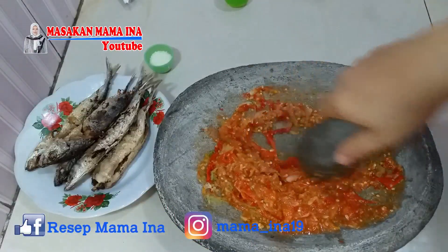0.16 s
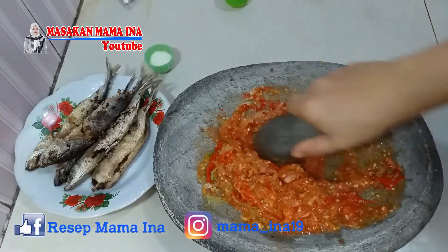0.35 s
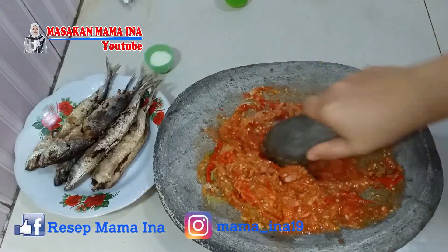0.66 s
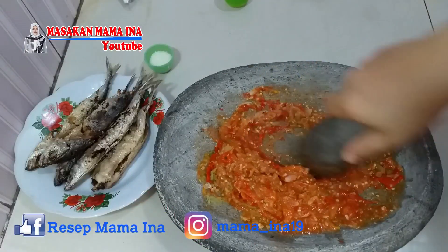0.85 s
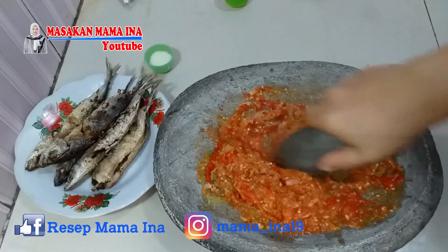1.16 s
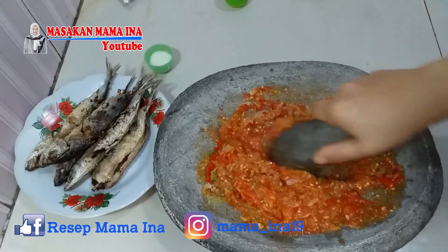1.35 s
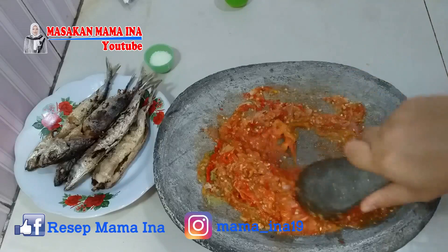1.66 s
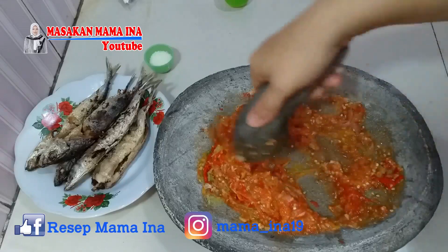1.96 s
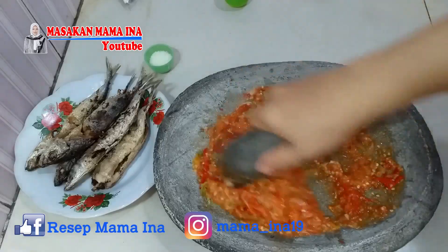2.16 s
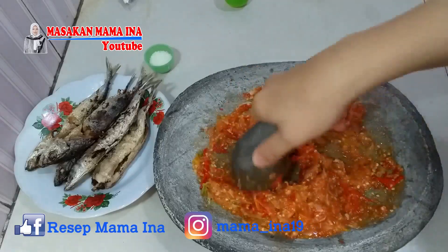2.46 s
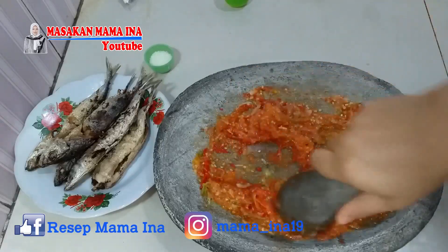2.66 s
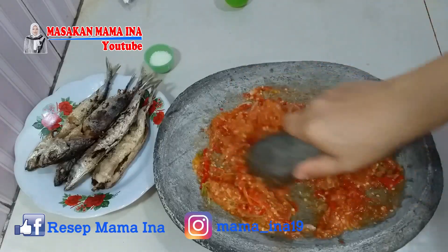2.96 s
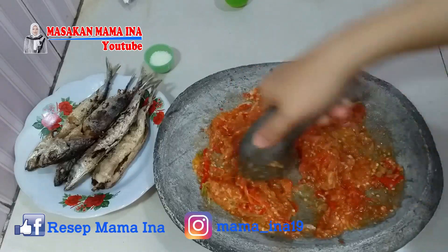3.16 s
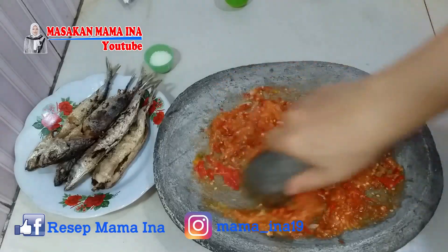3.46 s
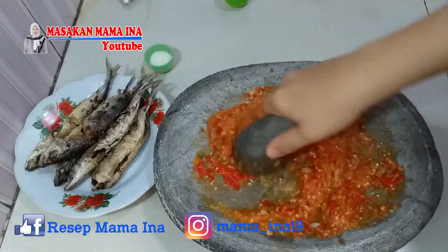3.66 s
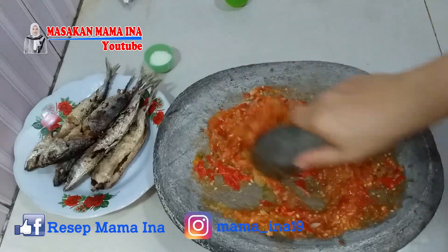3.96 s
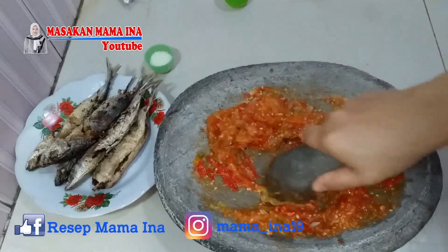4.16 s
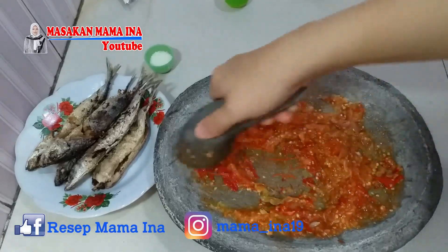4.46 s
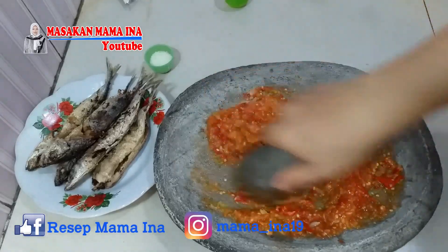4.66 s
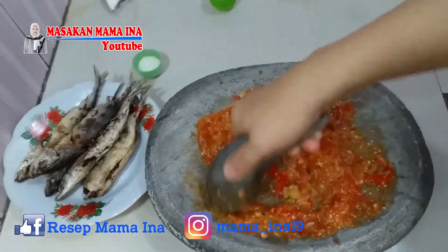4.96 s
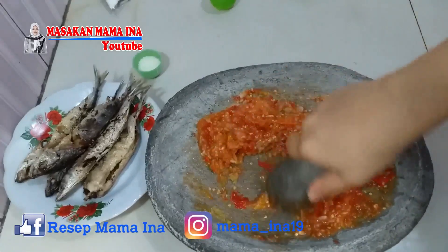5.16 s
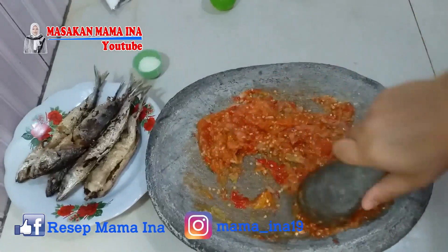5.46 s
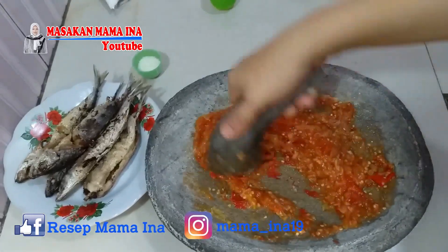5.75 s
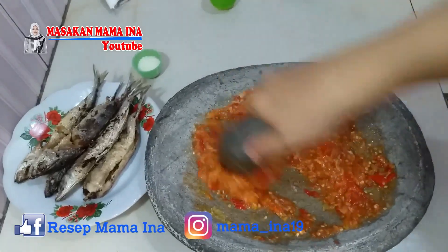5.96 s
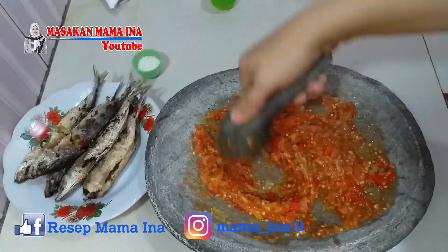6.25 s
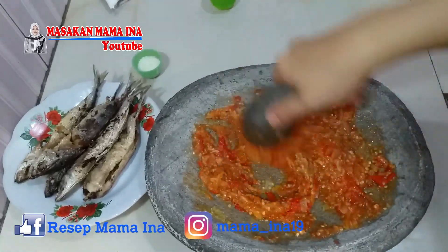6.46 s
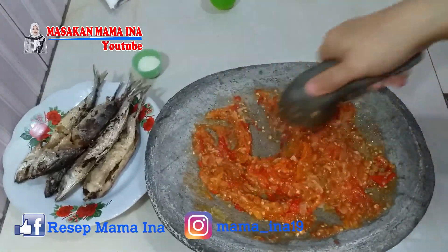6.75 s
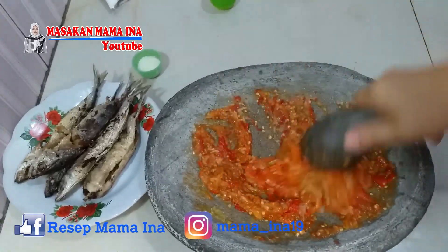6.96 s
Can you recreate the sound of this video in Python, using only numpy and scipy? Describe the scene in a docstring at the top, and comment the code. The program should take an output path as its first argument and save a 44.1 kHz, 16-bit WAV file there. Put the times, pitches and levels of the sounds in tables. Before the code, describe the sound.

A stone pestle knocks and scrapes in a stone mortar, squelching wet paste with small pops, in a hard, ringing kitchen.

```python
"""A faint scrape and wet squelching over a low hum come first, then the knocks of a stone pestle in a stone mortar.
The shallow mortar holds wet chilli paste and stands on a tiled kitchen floor.
Blows and streams of grit shake the same stone, floor and wall resonances; shaped noise makes the squelch.
Short torn tones make the pops; the hard room rings on, and the loudest blows flatten at full scale."""
import sys
import numpy as np
from scipy import signal
from scipy.fft import rfft, irfft, next_fast_len
from scipy.io import wavfile
from scipy.ndimage import uniform_filter1d, map_coordinates

SR = 44100
rng = np.random.default_rng(int(sys.argv[2]) if len(sys.argv) > 2 else 0)


def wav_out(sig):
    """Save sig, one row per channel (or a flat mono array), as 16-bit PCM at SR to the path in sys.argv[1]."""
    wavfile.write(sys.argv[1], SR, np.round(np.clip(np.atleast_2d(sig).T, -1, 1) * 32767).astype(np.int16))


N = 313992  # length of the scene in samples

# What the contacts shake: each body is a set of resonances.
# Each row: pitch in Hz, width in Hz, level in dB relative to the other rows of that body.
FLOOR_MODES = [(140.8, 8.1, 0.5), (205.3, 18.4, -1), (283, 19, -5), (334, 13, 1)]
MORTAR_BASE_MODES = [(405, 18.1, 4), (478, 13.3, 5), (561, 43, -6.5), (719.7, 85, 0), (519, 405, -8)]
WALL_MODES = [(844, 58, 5.5), (910.5, 80, 7.5), (1027, 74, 3), (1252, 160, 4), (1336, 580, -2.5)]
BOWL_MODES = [(1609, 28.3, 11.5), (1675, 24, 4), (3390, 19, -6)]
PESTLE_MODES = [(1745, 27, 10.5), (1876, 760, -8)]
PESTLE_OVERTONE_MODES = [(3307, 43, 7.5), (5240, 40, 6.5), (7020, 57, 1.5)]
GRIT_MODES = [(3093, 60, 14.5), (3740, 41, 1.5), (3930, 37, -15.5), (4760, 500, 9), (5340, 47, 10.5),
              (7770, 120, 1), (10950, 300, 3.5), (2880, 9000, -6)]


def stones():
    """Single pushes and streams of grit drive floor, mortar, wall and pestle, and each body rings in its own way."""
    pushes, crunch = blows()
    grains = gritty(grain_s=0.0012, depth_db=5)
    patches = clumps(span_bins=4, span_frames=5, depth_db=4.5)
    # the five lower bodies feel single grains; pestle overtones and grit get clumped noise
    rub = (crunch + scrapes()) * ([grains] * 5 + [patches] * 2)
    bodies = (FLOOR_MODES, MORTAR_BASE_MODES, WALL_MODES, BOWL_MODES,
              PESTLE_MODES, PESTLE_OVERTONE_MODES, GRIT_MODES)
    sound = []
    for push, drag, modes in zip(pushes, rub, bodies):
        tap = body(modes)
        # a blow is scaled by the peak of the tap, a rub by its energy
        drive = push / np.abs(tap).max() + drag / np.linalg.norm(tap)
        sound.append(signal.fftconvolve(drive, tap)[:N])
    return np.array(sound)


CRUNCH_RISE_S, CRUNCH_T60_S = 0.0032, 0.1  # time constant of the rise; time to die away by 60 dB
BLOW_OVERTONES_DB = -32.5  # overtones against the ring of the pestle
# Knocks of the pestle. Each row: start in seconds, thud level in dB, hardness in dB, mortar base over thud in dB,
# bowl ring in dB, pestle ring in dB, grit in dB, crunch in dB against the push.
PESTLE_BLOWS = [(0.642, -19, 3, -1.5, -47, -31, -23.5, -23), (0.976, -28.5, 6.5, 5.5, -36, -36, -18.5, -12),
                (1.672, -4.5, 6, 2.5, -9, -11.5, -44.5, -11),
                (2.688, -15, 0.5, 5.5, -31, -15, -25.5, -16.5),
                (2.748, -18.5, 3.5, 7.5, -42, -35, -36, -12), (3.349, -5.5, 6.5, -3.5, -2, -6.5, -10, -4),
                (3.87, -29, -3.5, 2.5, -26, -17.5, -23, -12.5),
                (4.280, -29.5, -2.5, 0.5, -58, -56.5, -24, -11), (4.522, -10, 6, 1.5, -9.5, -10.5, -16, -1),
                (4.832, -25, 1, -3, -41, -41, -19, -30.5), (5.061, -29.5, -2, -11, -30, -45.5, -30, -18),
                (5.492, -15.5, 0.5, 1, -21, -31.5, -22.5, -9.5), (6.381, -4, 3, -6.5, 5, -1.5, -15.5, -12),
                (6.549, -18, 2.5, 0, -18.5, -30, -19, -14), (6.801, -9.5, 1, -1, 6, -2, -29, -11.5)]


def blows():
    """Each blow is one push, rounded by the paste, followed by a short crunch of crushed paste that dies away."""
    pushes, crunches = np.zeros((7, N)), np.zeros((7, N + SR))
    t = np.arange(SR // 5) / SR
    swell = amp(-60 * t / CRUNCH_T60_S) * (1 - np.exp(-t / CRUNCH_RISE_S))
    for start_s, thud, hard, base, bowl, pestle, grit, crunch in PESTLE_BLOWS:
        gains = shares(thud, hard, base, bowl, pestle, BLOW_OVERTONES_DB, grit)
        first = round(start_s * SR)
        pushes[:, first] = gains
        crunches[:, first:first + len(swell)] += np.outer(gains * amp(crunch), swell)
    # paste cushions the blow: the five lower bodies get a rounded push
    contact = t[:200] ** 3 * np.exp(-t[:200] / 0.00006)
    pushes[:5] = signal.fftconvolve(pushes[:5], contact[None] / contact.sum(), axes=1)[:, :N]
    return pushes, crunches[:, :N]


SCRAPE_TOP = 0.62  # share of a scrape before its top
BASE_LEAD_DB, SCRAPE_OVERTONES_DB = 3.5, -8  # mortar base over the drag; overtones against the pestle ring
GRIT_DB, GRIT_GROWS = -17.5, 0.59  # grit = first + second x drag, in dB: it swells less than the drag
# Drags of the pestle. Each row: start in seconds, length in seconds, drag level in dB, hardness in dB,
# bowl ring in dB, pestle ring in dB.
PESTLE_SCRAPES = [(0.0, 0.045, -45, -5, -57, -52.5), (0.35, 0.033, -30.5, -1, -45, -44),
                  (0.429, 0.029, -30, 0.5, -40, -38), (0.445, 0.046, -28.5, 2, -54, -30),
                  (0.627, 0.027, -47, 3.5, -55, -23), (0.732, 0.013, -44.5, 13, -48, -53),
                  (0.744, 0.021, -41, -0.5, -63.5, -41), (0.961, .03, -34, 1, -61, -39.5),
                  (1.155, 0.064, -31, 2, -27, -38), (1.261, 0.035, -41, 14.5, -59, -48.5),
                  (1.278, 0.046, -31, -1, -72, -44), (1.703, 0.0485, -41.5, -16, -21.5, -43),
                  (2.156, 0.13, -40, -1.5, -48.5, -45.5), (2.692, 0.068, -27.5, 1.5, -32.5, -28),
                  (2.902, .11, -29.5, 0.5, -37.5, -31.5), (3.889, 0.045, -43.5, 2, -51, -54),
                  (4.072, 0.051, -45.5, -7.5, -63, -52), (4.569, 0.024, -30, 0.5, -33, -31.5),
                  (4.657, .025, -37, -7, -29, -38), (4.828, 0.034, -28, -3, -37, -55.5),
                  (5.055, .1, -27.5, -5.5, -33, -26), (5.507, 0.076, -26, -3, -27.5, -28),
                  (5.954, 0.067, -37, -4.5, -47, -43), (6.106, 0.036, -36, -4, -54, -56),
                  (7.016, 0.09, -49.5, 2, -51, -54)]


def scrapes():
    """A scrape presses stone on grit: the drive to each body swells to a top and sinks again."""
    drive = np.zeros((7, N + SR))
    for start_s, length_s, drag, hard, bowl, pestle in PESTLE_SCRAPES:
        swell = stroke(length_s, SCRAPE_TOP)
        grit = GRIT_DB + GRIT_GROWS * drag
        gains = shares(drag, hard, BASE_LEAD_DB, bowl, pestle, SCRAPE_OVERTONES_DB, grit)
        first = round(start_s * SR)
        drive[:, first:first + len(swell)] += np.outer(gains, swell)
    return drive[:, :N]


def shares(thud_db, hard_db, base_db, bowl_db, pestle_db, overtones_db, grit_db):
    """Gains of the seven bodies: a harder contact shakes the wall more and the floor less."""
    return amp([thud_db - hard_db, thud_db + base_db, thud_db + hard_db,
                bowl_db, pestle_db, pestle_db + overtones_db, grit_db])


def stroke(length_s, top):
    """A rounded swell of this length with its top at the given share."""
    progress = np.arange(round(length_s * SR)) / (length_s * SR)
    return np.interp(progress, [0, top, 1], [0, 1, 0]) ** 0.5


def body(modes, soft_hz=6000):
    """The answer of a set of resonances to one tap; the film of paste softens the top."""
    f = np.fft.rfftfreq(SR // 2, 1 / SR)
    rings = 0
    for k, (center, width, db) in enumerate(modes):
        ring = 1j * f * width / (center ** 2 - f ** 2 + 1j * f * width)
        rings = rings + (-1) ** k * amp(db) * ring  # neighbours swing in opposite directions
    return irfft(rings / (1 + 1j * f / soft_hz) ** 2)


SWING_DB = 30  # a squeeze rises and falls by this much in its rise and fall times
# Squeezes of the paste. Each row: time of the top in seconds, rise in seconds, fall in seconds,
# squelch level in dB, darker smear level in dB.
PASTE_SQUEEZES = [(0.0, .01, 1, -50, -54.5), (0.331, 0.014, 0.13, -34, -36),
                  (0.458, 0.088, 0.15, -34.5, -29.5), (0.646, 0.11, 0.13, -38.5, -49),
                  (0.888, 0.012, .25, -30.5, -41), (1.176, .09, .09, -36, -39.5),
                  (1.306, .08, 0.36, -45.5, -47), (1.645, 0.01, 0.57, -41, -85.5),
                  (2.088, .08, 0.066, -40.5, -46), (2.215, 0.13, 0.31, -39.5, -41.5),
                  (2.641, 0.026, .4, -47, -61), (2.805, 0.096, .12, -35, -53),
                  (2.965, 0.15, 0.28, -38.5, -34.5), (3.355, 0.0067, 0.14, -37, -20),
                  (3.43, 0.11, 0.47, -41.5, -34.5), (3.53, 0.12, 0.33, -45, -51.5),
                  (3.84, 0.056, 0.93, -44.5, -57), (3.943, 0.082, 0.35, -39, -42.5),
                  (4.288, 0.55, 0.22, -49.5, -48), (4.527, 0.0068, .1, -37.5, -23.5),
                  (4.59, 0.02, 0.18, -33, -26.5), (4.706, 0.15, 0.26, -39, -97),
                  (4.854, 0.49, 0.023, -44, -40), (5.128, 0.64, 0.76, -44.5, -47),
                  (5.534, 0.056, 0.34, -38.5, -44), (5.981, 0.18, 0.55, -41, -43),
                  (6.15, 0.023, 0.067, -36, -57), (6.41, .1, 0.35, -43.5, -40.5),
                  (6.52, 0.33, 0.15, -47.5, -61), (6.658, .035, 0.028, -50, -54),
                  (6.886, 0.053, 1, -50.5, -49.5), (7.12, .5, .1, -45, -55)]
# Colours of the squelch and the smear. Each row: frequency in Hz, relative level in dB.
SQUELCH_COLOUR = [(1760, -38), (3000, -3.5), (3840, -2.5), (7220, -1), (8310, 0), (9180, -6), (15300, -5.5),
                  (16300, -28.5)]
SMEAR_COLOUR = [(600, -15.5), (1200, 16), (2200, 13.5), (4500, 11), (7000, -100.5)]


def paste():
    """Squeezed wet paste gives a bright clumpy squelch, a sprinkle of small pops and a darker smear."""
    t, power = np.arange(N) / SR, np.zeros((2, N))
    for top, rise, fall, *db in PASTE_SQUEEZES:
        near = slice(max(0, round((top - 2 * rise) * SR)), round((top + 2 * fall) * SR))
        late = t[near] - top
        distance = np.where(late < 0, -late / rise, late / fall)
        power[:, near] += np.outer(amp(db), amp(-SWING_DB * distance)) ** 2
    squelch_level, smear_level = np.sqrt(power)
    squelch = coloured(clumps(span_bins=7, span_frames=8, depth_db=5.0), SQUELCH_COLOUR)
    smear = coloured(clumps(span_bins=4, span_frames=12, depth_db=6.0), SMEAR_COLOUR)
    return squelch_level * (squelch + small_pops()) + smear_level * smear


def small_pops():
    """120 tiny bubbles at random times and pitches; a few are somewhat louder than the rest."""
    out = np.zeros(N + SR)
    for when, pitch, size in rng.random((120, 3)):
        burst = pop(2500 * 4.5 ** pitch, t60_s=0.003, ragged=0.3)
        first = round(when * N)
        out[first:first + len(burst)] += amp(-2 - 1.5 * np.log(size + 0.01)) * burst
    return out[:N]


POP_T60_S, POP_RAGGED = 0.0081, 0.48  # time to die away by 60 dB; strength of the noise against the tone
# Air pockets that burst in the paste. Each row: start in seconds, level in dB, pitch in Hz.
PASTE_POPS = [(0.328, -14, 3860), (0.3456, -17.5, 5100), (0.743, -27, 4700), (0.889, -12, 7500),
              (1.1465, -31, 5000), (1.6487, -25, 8400), (1.7994, -31, 3120), (1.831, -27.5, 6560),
              (1.8536, -31, 7300), (1.9063, -31, 6450), (1.921, -34.5, 6370), (1.8716, -24, 8300),
              (2.0767, -25, 3900), (2.2374, -23, 3100), (2.637, -36, 7640), (2.651, -31, 8300),
              (3.038, -26, 3130), (3.0684, -23, 2680), (3.089, -14, 2760), (3.5663, -26, 8100),
              (3.6146, -17, 5500), (3.6711, -19, 3110), (3.974, -31, 3920), (3.9897, -20.5, 4000),
              (4.0072, -29, 3900), (4.2415, -32, 2970), (4.27, -23, 3140), (4.5967, -20, 4800),
              (4.7704, -20, 3250), (4.832, -22, 5060), (4.8703, -27.5, 3180), (4.8883, -23.5, 3290),
              (5.2283, -29, 6610), (5.252, -24.5, 6100), (5.6385, -26, 4840), (5.88, -32.5, 8040),
              (6.0736, -28, 3380), (6.1232, -24.5, 3580), (6.1528, -26.5, 3700), (6.196, -24.5, 8060),
              (6.553, -26.5, 4800), (6.8912, -30, 4070), (6.9683, -35, 6600)]


def single_pops():
    """Air pockets in the paste burst one by one, each with its own pitch."""
    out = np.zeros(N + SR)
    for start_s, db, hz in PASTE_POPS:
        burst = pop(hz, POP_T60_S, POP_RAGGED)
        first = round(start_s * SR)
        out[first:first + len(burst)] += amp(db) * burst
    return out[:N]


def pop(hz, t60_s, ragged):
    """A burst bubble: a fast-fading tone at its pitch, torn by noise when ragged."""
    t = np.arange(SR // 25) / SR
    noise = uniform_filter1d(rng.standard_normal(len(t)), size=2)
    tone = np.sin(2 * np.pi * hz * t) + ragged * noise
    return amp(-60 * t / t60_s) * (1 - np.exp(-t / 0.0001)) * tone


# How long the room rings. Each row: frequency in Hz, time to die away by 60 dB in seconds.
ROOM_DECAY = [(100, 0.96), (300, 0.81), (800, 0.5), (2000, 0.55), (5000, 0.62), (12000, 0.31)]


def kitchen(x):
    """Each frequency dies at its own speed; the echo pattern is drawn afresh every 0.2 s."""
    out, step = np.zeros(N + 2 * SR), SR // 5
    delay = round(0.004 * SR)
    for start in range(0, N, step):
        hz, t, z = signal.stft(rng.standard_normal(SR * 3 // 4), SR, nperseg=256)
        fade = amp(-60 * t / along(ROOM_DECAY, hz)[:, None])
        tail = signal.istft(z * fade, SR, nperseg=256)[1]
        echo = signal.fftconvolve(x[start:start + step], tail / np.linalg.norm(tail))
        first = start + delay
        out[first:first + len(echo)] += echo
    return out[:N]


HUM_DB = -46.5  # average level of the rumble
# Colour of the rumble and hiss. Each row: frequency in Hz, relative level in dB.
HUM_COLOUR = [(12, -20.5), (20, -29.5), (91, 5), (135, -6.5), (349, -8.5), (745, -25), (2220, -37),
              (5940, -31.5), (7020, -49.5), (7640, -61.5), (9830, -48.5), (14600, -48), (16300, -42.5)]
# Wavering low tones. Each row: pitch in Hz, width in Hz, level in dB.
DRONE_TONES = [(213.3, 3.6, -51), (398.3, 27, -54)]


def hum():
    """Distant rumble of house and street, swelling slightly and slowly, with wavering low tones and faint hiss."""
    swell = map_coordinates(rng.standard_normal(N // 4000 + 4), [np.arange(N) / 4000])
    out = amp(HUM_DB + 0.4 * swell) * coloured(rng.standard_normal(N), HUM_COLOUR)
    for center, width, db in DRONE_TONES:
        # a very narrow band of noise sounds like a wavering tone
        narrow = filtered(rng.standard_normal(N), lambda hz: np.exp(-((hz - center) / width) ** 2))
        out += amp(db) * unit(narrow)
    return out


def gritty(grain_s, depth_db):
    """Noise whose strength jumps from grain to grain."""
    grain = (np.arange(N) / (grain_s * SR)).astype(int)
    steps = rng.standard_normal(N)[grain]
    return unit(amp(depth_db * steps) * rng.standard_normal(N))


def clumps(span_bins, span_frames, depth_db):
    """Noise in clumps: each small patch of time and frequency has its own strength."""
    z = signal.stft(rng.standard_normal(N), nperseg=128)[2]
    field = uniform_filter1d(rng.standard_normal(z.shape), span_bins, axis=0)
    field = uniform_filter1d(field, span_frames, axis=1)
    return unit(signal.istft(z * amp(depth_db * unit(field)), nperseg=128)[1][:N])


def coloured(x, colour):
    """x with a (Hz, dB) colour, at rms 1."""
    return unit(filtered(x, lambda hz: amp(along(colour, hz))))


def amp(db):
    """Decibels to gain."""
    return 10 ** (np.asarray(db) / 20)


def unit(x):
    """x at rms 1."""
    return x / np.sqrt(np.mean(x ** 2) + 1e-20)


def along(points, hz):
    """Values between (Hz, value) points, read on a log frequency axis."""
    f, v = np.transpose(points)
    return np.interp(np.log(hz + 1), np.log(f + 1), v)


def filtered(x, response):
    """x with each frequency scaled by the given response."""
    m = next_fast_len(N + SR // 2)
    return irfft(rfft(x, m) * response(np.fft.rfftfreq(m, 1 / SR)), m)[..., :N]


# How much of each body reaches the room. Seven levels in dB: floor, mortar base, wall, bowl, pestle,
# pestle overtones, grit.
ROOM_SEND_DB = [-3.5, -5.5, -9.5, -10.5, -9, -6.5, -9]


def scene():
    """One spot on the floor, heard from close above: stones, paste, pops, room and hum add up."""
    rock, wet, pops = stones(), paste(), single_pops()
    to_room = amp(ROOM_SEND_DB) @ rock + amp(-14) * (pops + wet)
    mono = rock.sum(axis=0) + wet + pops + kitchen(to_room) + hum()
    return np.array([mono, mono])


TOP_HZ = 15800  # nothing is heard above this
# Scatter between the two channels. Each row: frequency in Hz, filter gain in dB.
SIDE_COLOUR = [(40, -37.5), (150, -53.5), (1500, -59), (2800, -40), (5500, -34), (10000, -21)]


def record(dry):
    """The loudest blows flatten near full scale; faint scatter, added to one channel, is taken from the other."""
    clipped = dry / (1 + np.abs(dry / 1.05) ** 8) ** (1 / 8)
    flicker = rng.standard_normal(N // 400 + 1).repeat(400)[:N]  # a new random gain every 400 samples
    scatter = filtered(clipped[0] * flicker, lambda hz: amp(along(SIDE_COLOUR, hz)))
    return filtered(clipped + [scatter, -scatter], lambda hz: hz < TOP_HZ)


dry = scene()
out = record(dry)
wav_out(out)
```